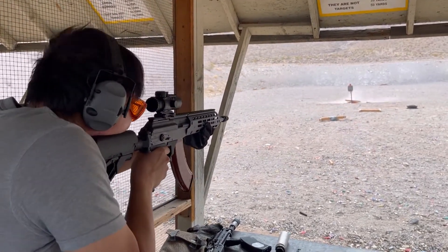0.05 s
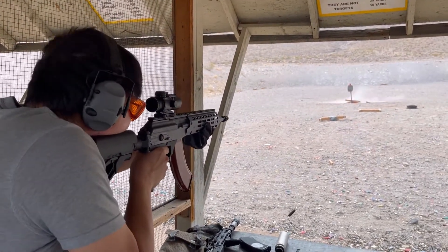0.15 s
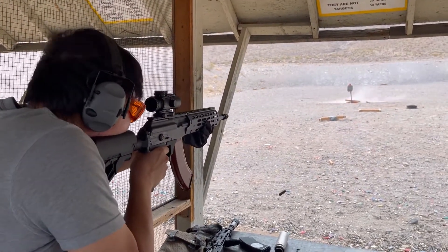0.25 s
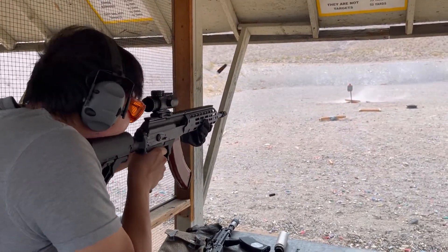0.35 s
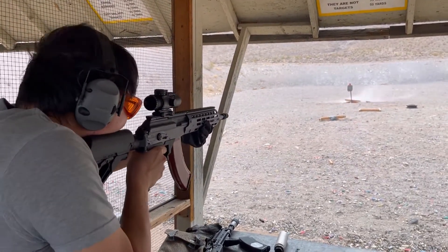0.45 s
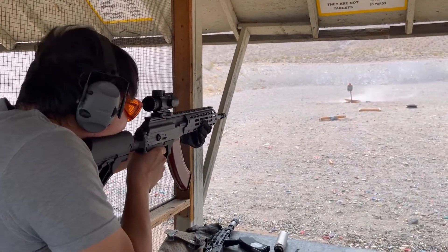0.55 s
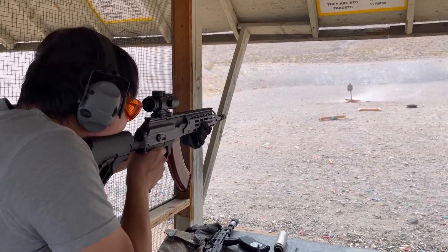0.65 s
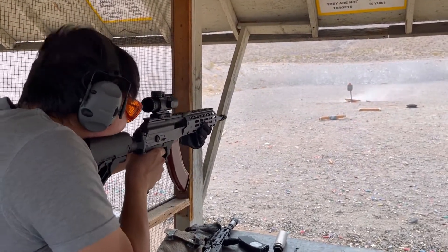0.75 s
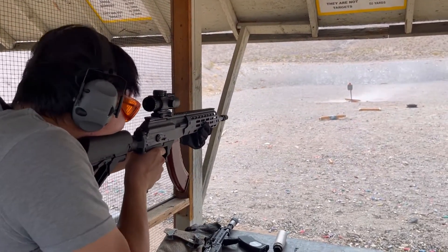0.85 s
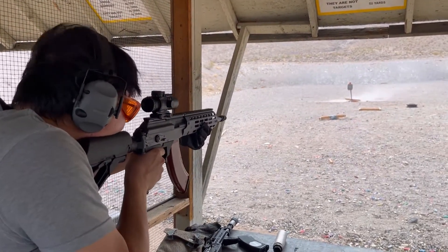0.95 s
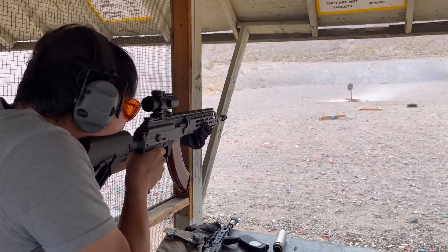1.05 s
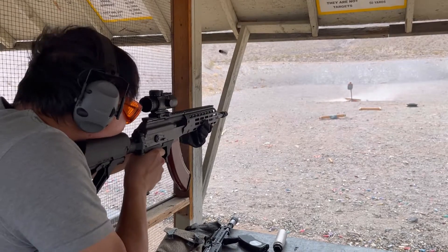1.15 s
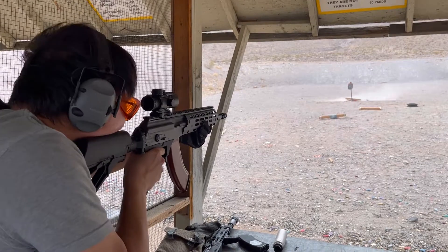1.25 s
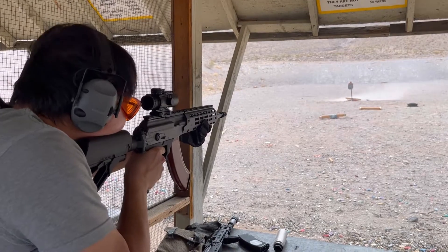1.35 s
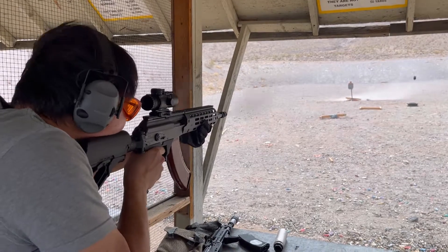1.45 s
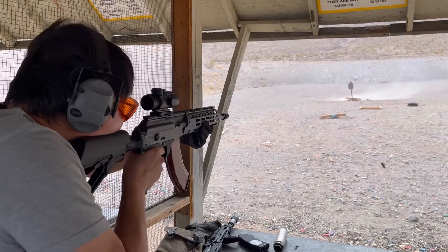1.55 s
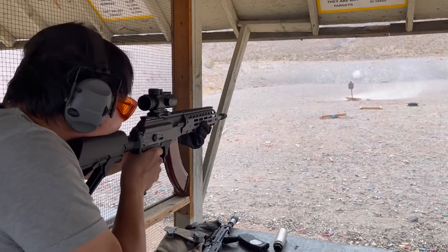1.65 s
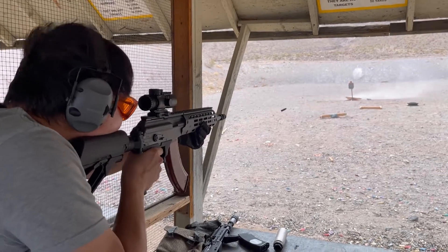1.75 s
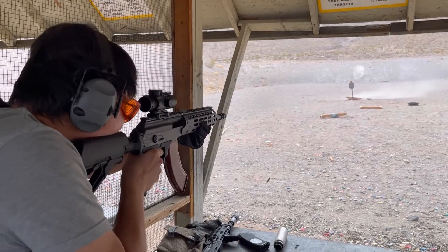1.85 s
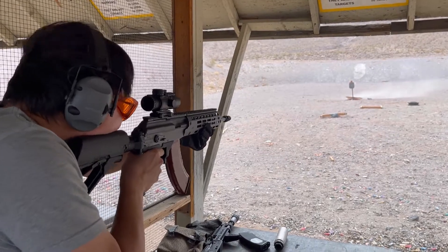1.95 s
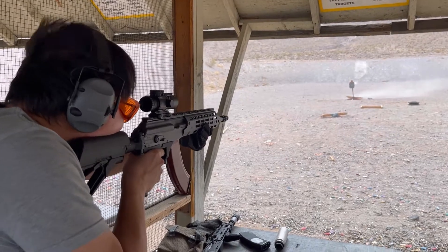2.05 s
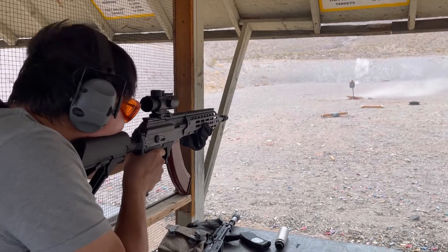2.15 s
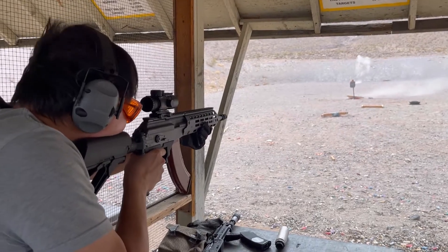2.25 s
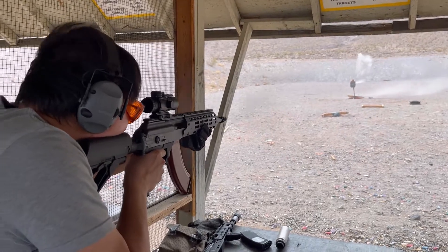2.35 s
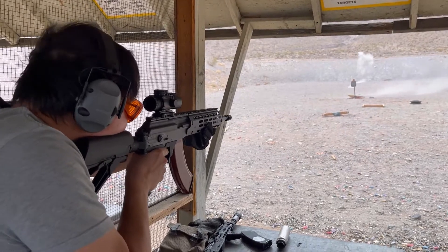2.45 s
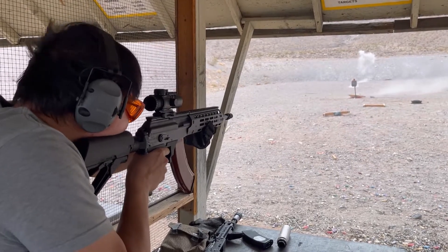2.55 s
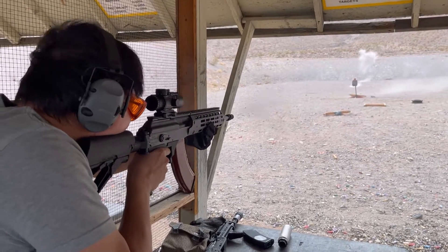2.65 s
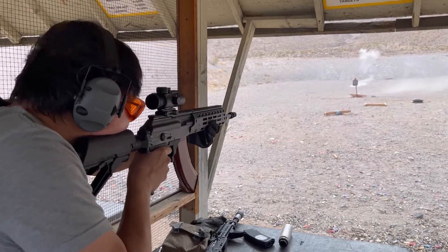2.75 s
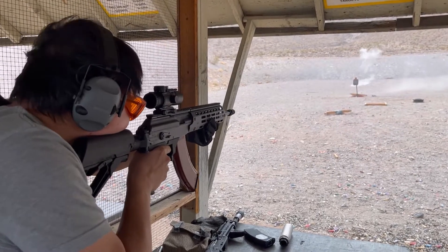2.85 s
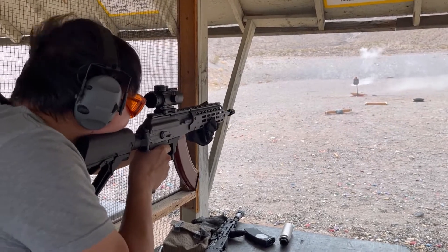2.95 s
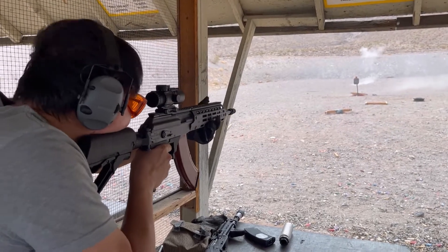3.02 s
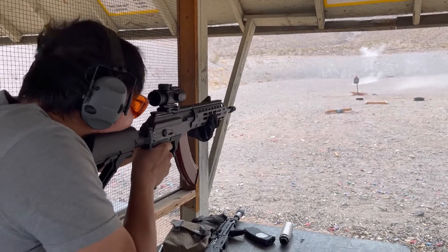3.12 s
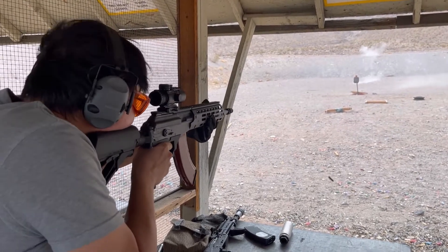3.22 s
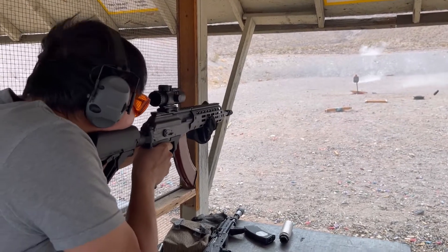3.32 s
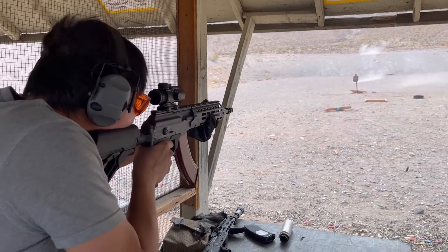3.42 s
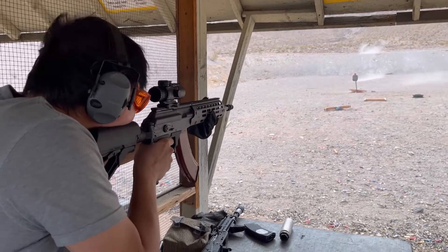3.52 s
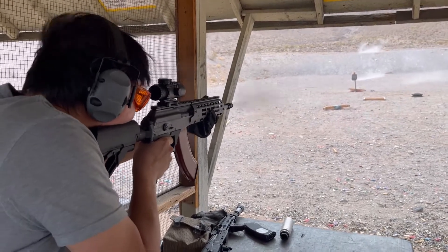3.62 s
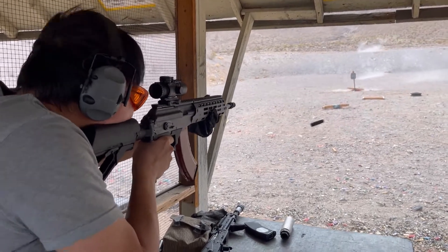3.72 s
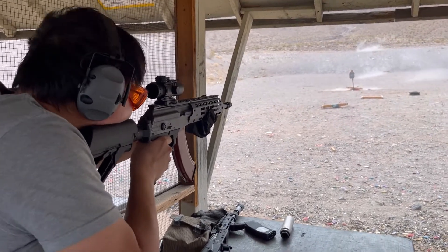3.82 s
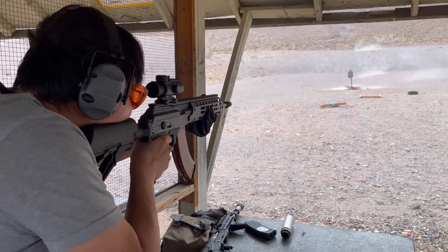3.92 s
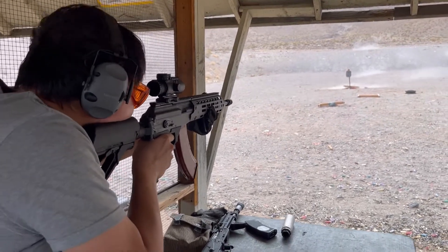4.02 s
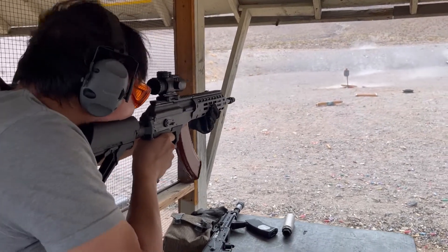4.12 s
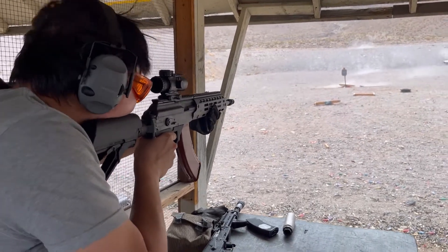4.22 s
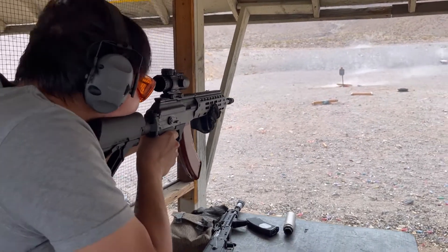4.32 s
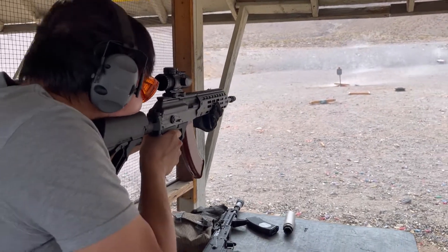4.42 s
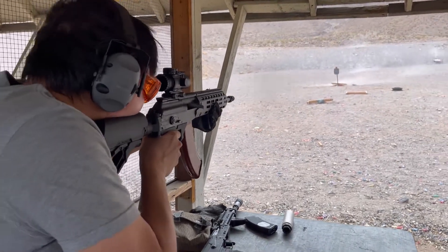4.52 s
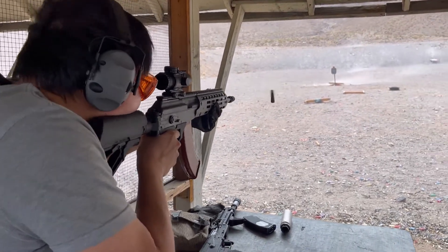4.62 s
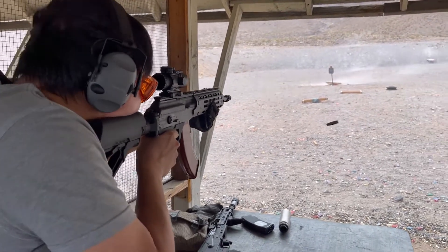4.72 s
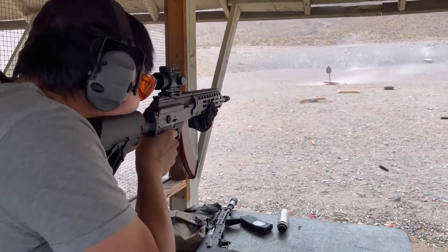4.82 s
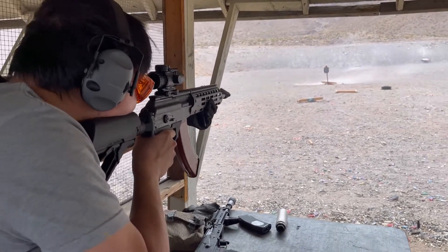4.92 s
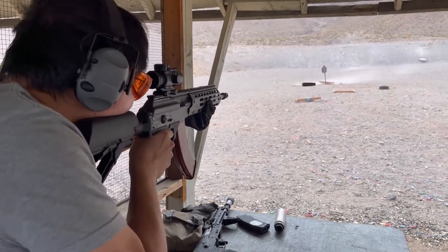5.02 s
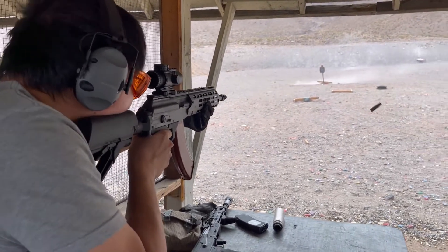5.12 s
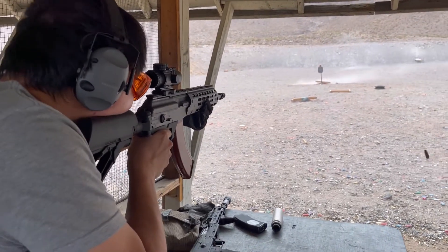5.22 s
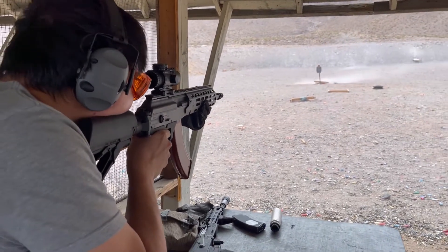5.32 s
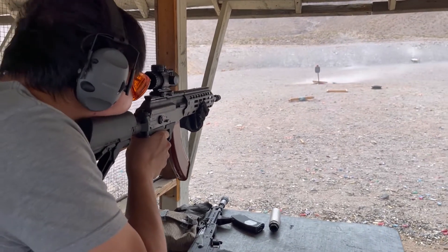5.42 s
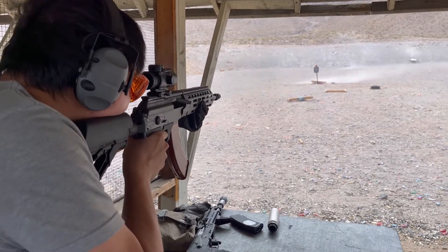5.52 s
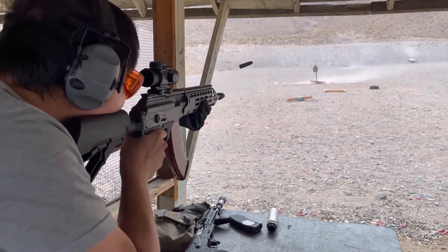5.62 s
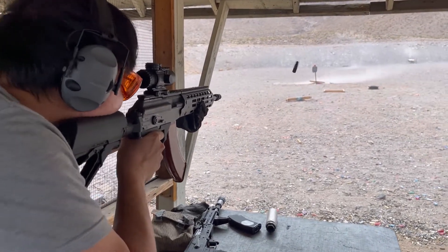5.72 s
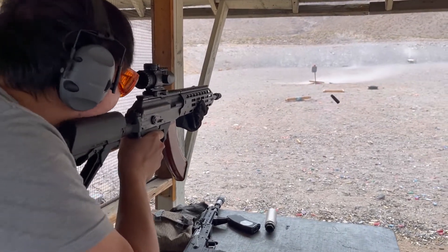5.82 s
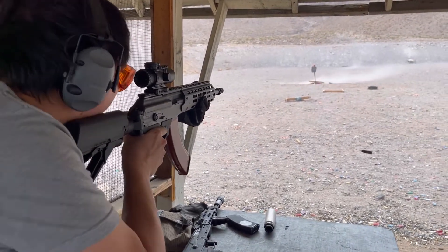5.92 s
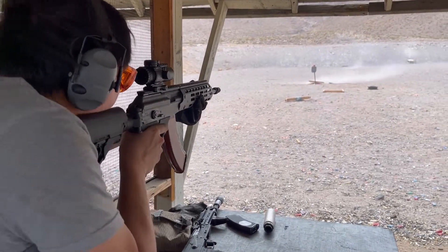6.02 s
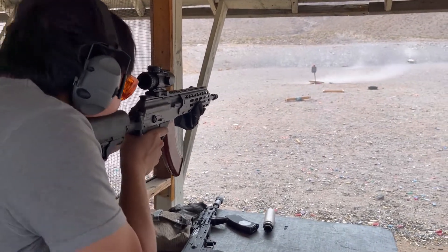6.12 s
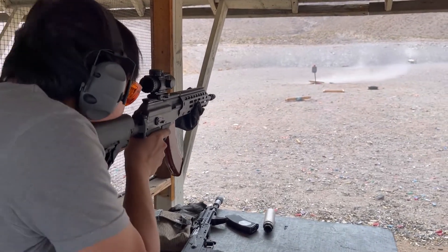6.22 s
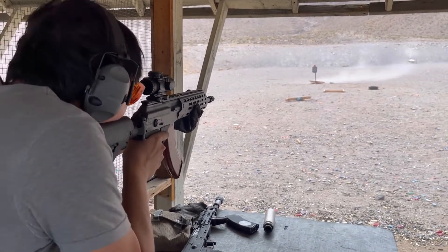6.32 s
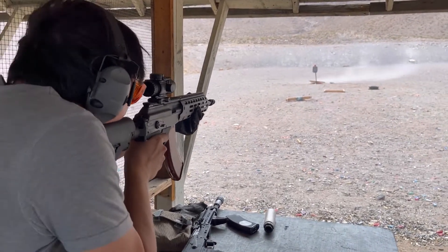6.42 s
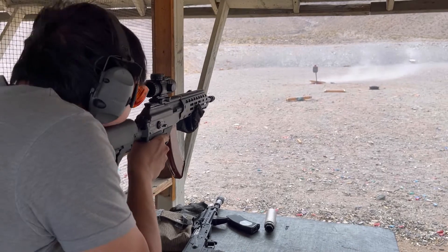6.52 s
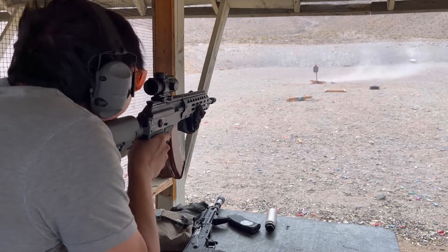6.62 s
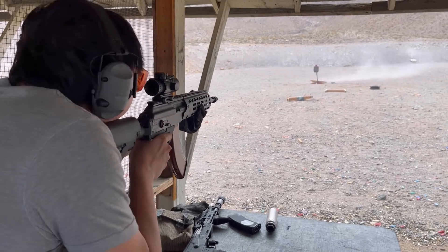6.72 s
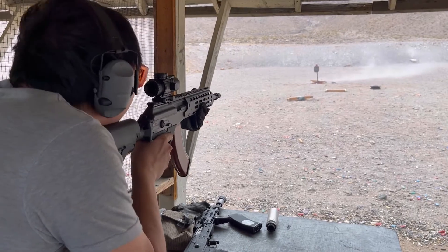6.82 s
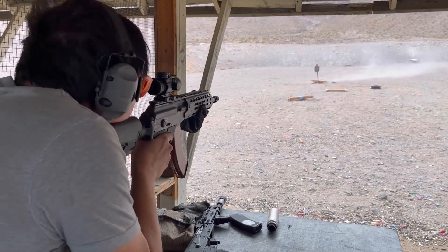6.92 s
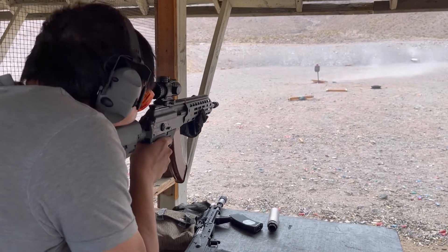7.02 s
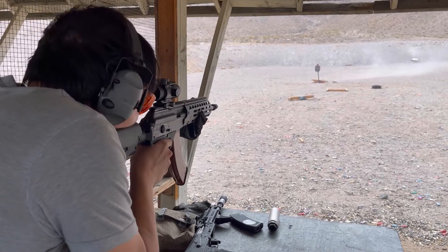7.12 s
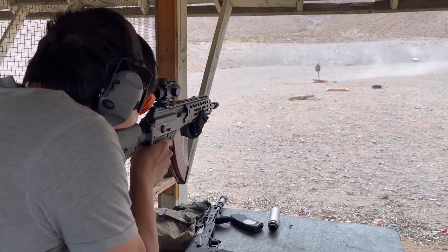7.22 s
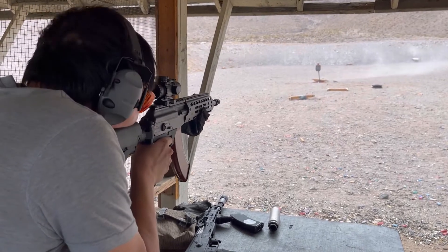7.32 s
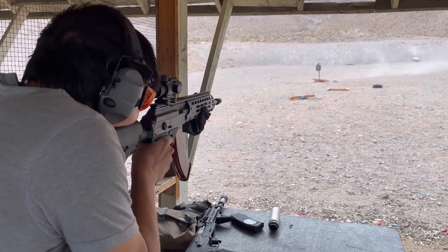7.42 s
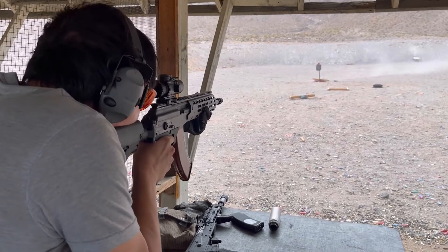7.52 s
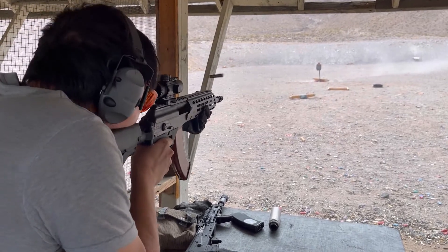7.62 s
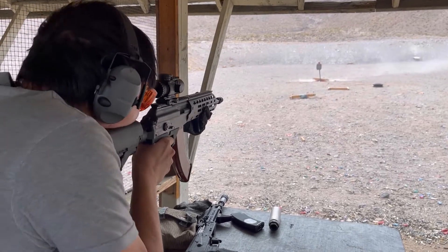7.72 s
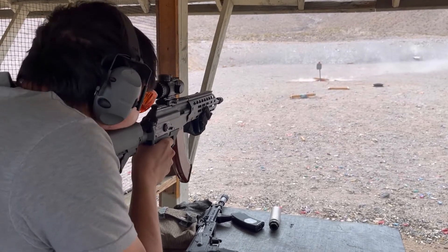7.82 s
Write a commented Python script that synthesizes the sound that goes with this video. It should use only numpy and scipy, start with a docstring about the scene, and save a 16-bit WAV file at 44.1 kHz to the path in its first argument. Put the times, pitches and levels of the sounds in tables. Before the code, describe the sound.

Sharp semi-automatic rifle cracks echo across an outdoor range, a distant steel target ringing after many, while wind buffets the microphone.

```python
"""A rifle fires fourteen quick shots under a wooden shelter roof, the first just before the start: filtered
noise that rolls around shelter and range in nearly the same way each time, with slaps and ringing boards.
Nine hits ring a steel plate downrange, as decaying modes behind a noise clank. Spent cases land in gravel
and gear ticks, as short noise bursts. Wind rumbles and rustles as filtered noise, and gusts buffet the
two-port pocket microphone a step away."""
import sys
import numpy as np
from scipy import signal
from scipy.fft import rfft, irfft, next_fast_len
from scipy.io import wavfile
from scipy.ndimage import uniform_filter1d

SR = 44100
rng = np.random.default_rng(int(sys.argv[2]) if len(sys.argv) > 2 else 0)


def to_wav(s):
    """Save 16-bit WAV."""
    ch = np.atleast_2d(s).T  # columns
    pcm = np.round(np.clip(ch, -1, 1) * 32767)  # PCM
    wavfile.write(sys.argv[1], SR, pcm.astype(np.int16))


def gain_from_db(level_db):
    """Convert decibel levels to linear amplitude factors (20 dB per decade)."""
    decades = np.asarray(level_db, float) / 20
    return 10 ** decades


N = 346626
TIME = np.arange(next_fast_len(N, True)) / SR  # s, padded to a quick transform length


def hz_of(count):
    """Frequencies of a real transform, nudged off zero so their logarithm exists."""
    return np.fft.rfftfreq(count, 1 / SR) + 0.00072


def colour(x, points):
    """Filter by (f/Hz, level/dB) points, joined along log frequency."""
    hz, db = np.transpose(points)
    gain = gain_from_db(np.interp(np.log(hz_of(x.shape[-1])), np.log(hz), db))
    return irfft(rfft(x) * gain, x.shape[-1])


def unit(x):
    """Scale to rms 1."""
    return x / np.sqrt(np.mean(x ** 2))


def noise(count):
    """Two unrelated arrivals of white noise."""
    return rng.standard_normal((2, count))


def add(out, s, sound):
    """Mix a sound in at a time; it may start early or end late."""
    i = int(round(s * SR))
    out[:, max(i, 0):i + sound.shape[1]] += sound[:, max(-i, 0):out.shape[1] - i]


def burst(hz, t60, rise, octaves):
    """A short noise around a pitch that rises and dies away; it is 30 dB down at octaves to either side."""
    t = np.arange(2 ** 13) / SR
    band = [(hz / 2 ** octaves, -30), (hz, 0), (hz * 2 ** octaves, -30), (hz * 4 ** octaves, -70)]
    return unit(colour(noise(len(t)), band)) * (1 - np.exp(-t / rise)) * gain_from_db(-60 * t / t60)


def walk(rate):
    """Random levels held 1 / rate s and slewed twice; their spread is a little under 1."""
    k = int(SR / rate)
    steps = np.repeat(rng.standard_normal(len(TIME) // k + 1), k)
    return uniform_filter1d(uniform_filter1d(steps, k // 2), k // 2)[:len(TIME)]


def modes(table, t, rise):
    """One decaying complex rotation per (f/Hz, level/dB, t60/s) mode."""
    hz, db, t60 = np.transpose(table)[:, :, None]
    return (1 - np.exp(-t / rise)) * gain_from_db(db - 60 * t / t60) * np.exp(2j * np.pi * hz * t)


def strike(rotations, gains):
    """Each mode starts at its own phase, nearly the same for both arrivals."""
    turns = rng.random(len(gains)) + .04 * rng.standard_normal((2, len(gains)))
    return ((gains * np.exp(2j * np.pi * turns)) @ rotations).imag


# slow swell of the wind, around which it wanders: [t/s, level/dB]
WIND_SWELL = [(0, -41.5), (1.0, -37.5), (1.6, -38), (2.3, -43), (2.98, -34.5), (3.09, -40.5), (3.45, -44.5),
              (4.0, -44), (4.8, -41), (5.3, -43), (5.9, -45), (6.2, -40.5), (6.5, -41), (6.65, -55.5),
              (7.25, -68), (7.37, -66), (7.5, -57.5)]
# relative spectrum of the large eddies' rumble: [f/Hz, level/dB]
RUMBLE_COLOUR = [(20, -29), (45, -5), (80, 0.5), (150, -3), (260, -6), (900, -72.5)]
# relative spectrum of the lighter rustle: [f/Hz, level/dB]
RUSTLE_COLOUR = [(150, -19), (300, 2), (600, -2), (1200, -15), (2400, -34.5), (5000, -60.5),
                 (12000, -100.5)]
# gusts breaking on the ports: [t/s, level/dB, length/s]
GUST_TIMES = [(3.03, -42, 0.026), (3.258, -42, .04), (3.341, -28.5, 0.017), (3.366, -40, .02),
              (3.452, -36.5, 0.015), (3.501, -49, 0.18), (5.37, -47, 0.077), (5.976, -40.5, 0.031),
              (6.032, -37.5, .065), (6.13, -40.5, .09), (6.329, -43, 0.097), (6.496, -30.5, 0.025),
              (6.519, -36, .015), (6.593, -37.5, .03), (6.77, -45.5, .05), (6.843, -40, 0.085),
              (6.999, -41.5, 0.051), (7.088, -45.5, 0.21), (7.268, -43, .04), (7.42, -51, .12)]
# relative spectrum of the brightest snaps of wind in the ports: [f/Hz, level/dB]
SNAP_COLOUR = [(200, -18.5), (600, -0.5), (1500, -6), (3000, -24), (6000, -42)]
GUST_ATTACK_S, GUST_RELEASE_S, GUST_SAG_DB = 0.0034, 0.009, -5.5
FLUTTER_DB = 4  # scales a random walk
SNAPS_PER_S, SNAP_SPREAD_DB = 420, 2
SNAP_DB = -25.5  # snaps' rms over the gusts' rms


def gust_level():
    """Gusts arrive fast, sag, flutter and trail off."""
    s, db, length = np.transpose(GUST_TIMES)[:, :, None]
    t = TIME - s
    attack = np.clip(t / GUST_ATTACK_S, 0, 1)
    release = np.clip(1 - (t - length) / GUST_RELEASE_S, 0, 1) ** 2
    sagging = gain_from_db(db + GUST_SAG_DB * np.clip(t / length, 0, 1))
    return np.sum(attack * release * sagging, axis=0) * gain_from_db(FLUTTER_DB * walk(70))


def wind_snaps(gusts):
    """Sparse random clicks of uneven size, loud where the gusts are."""
    clicks = rng.random(len(TIME)) < SNAPS_PER_S / SR
    sizes = gain_from_db(SNAP_SPREAD_DB * rng.exponential(size=len(TIME)))
    snaps = unit(colour(gusts * clicks * sizes * noise(len(TIME)), SNAP_COLOUR))
    return gain_from_db(SNAP_DB) * snaps * np.sqrt(np.mean(gusts ** 2))


def wind():
    """Large eddies make a wandering rumble; rustle flickers faster above it, and gusts lift both and snap."""
    swell = gain_from_db(np.interp(TIME, *np.transpose(WIND_SWELL)))
    gusts = gust_level()
    rumble = unit(colour(noise(len(TIME)), RUMBLE_COLOUR))
    rumble = (swell * gain_from_db(5.5 * walk(22)) + gain_from_db(-13.5) * gusts) * rumble
    rustle = unit(colour(noise(len(TIME)), RUSTLE_COLOUR))
    rustle_level = gain_from_db(-12.5 + 4.1 * walk(40)) * swell + gain_from_db(-10.0) * gusts
    return wind_snaps(gusts) + rumble + rustle_level * gain_from_db(4.0 * walk(160)) * rustle


# gear ticking: [t/s, level/dB]
GEAR_TICKS = [(3.1801, -48), (3.311, -54), (3.347, -47), (4.387, -45), (5.3884, -46), (6.0631, -34.5),
              (6.094, -44), (6.351, -47), (6.434, -55), (6.505, -46), (6.789, -51), (6.905, -48),
              (7.012, -52.5), (7.097, -50), (7.276, -53)]


def gear():
    """Small parts knock together in dry, very short ticks."""
    out = np.zeros((2, len(TIME)))
    for s, db in GEAR_TICKS:
        add(out, s, gain_from_db(db) * burst(1880, 0.011, 0.00047, 1.45))
    return out


# spent cases landing in gravel: [t/s, level/dB, centre f/Hz, t60/s]
CASE_LANDINGS = [(0.198, -49.5, 9000, 0.03), (0.605, -43.5, 3900, 0.18), (1.026, -48, 4000, 0.072),
                 (1.794, -47, 8920, 0.097), (2.112, -49.5, 8000, 0.063), (2.958, -57, 7930, 0.11),
                 (3.973, -51, 8940, 0.16), (4.322, -52.5, 9120, .04), (5.198, -41, 8500, 0.17),
                 (6.237, -57.5, 8980, 0.089), (6.618, -64, 9970, 0.069)]


def cases():
    """Cases scatter gravel in short, mostly bright hisses."""
    out = np.zeros((2, len(TIME)))
    for s, db, hz, t60 in CASE_LANDINGS:
        add(out, s, gain_from_db(db) * burst(hz, t60, 0.0017, 4.1))
    return out


# steel plate, six families of mode shapes, before its swing fades them: [f/Hz, level/dB, t60/s]
PLATE_FAMILIES = [
    [(2067, 0, 1), (7990, -12, 0.4)],
    [(6008, 0, 0.7), (10030, -8, .5)],
    [(2790, -7, 0.3), (4745, -4, 0.25), (5808, 0, 0.55)],
    [(5620, -9, 0.45), (6475, 0, 0.22), (7800, -9, 0.45), (8710, -6, .3), (11370, -5, 0.3)],
    [(6912, 0, 0.22), (8850, -11, .17)],
    [(4274, 0, 0.55), (5100, -7, .4)],
]
# bullets on the plate, a tenth of a second after their shot; where each lands decides what rings:
# [t/s, then level/dB of each of the six families]
PLATE_HITS = [(-.003, -48, -46.5, -64, -62.5, -58, -46.5), (.833, -67.5, -49, -52, -63, -33.5, -45.5),
              (1.205, -37, -62, -46, -64.5, -67.5, -66.5), (3.723, -60.5, -65, -62.5, -66.5, -65, -59.5),
              (4.16, -66, -74, -70, -46.5, -65, -65), (4.602, -67.5, -53.5, -35, -34.5, -59.5, -64),
              (4.965, -35, -33.5, -40.5, -34, -51.5, -43.5), (5.599, -53, -41, -41, -60, -69, -48),
              (7.689, -43, -57, -64, -68, -83, -68)]
SWUNG_DB = -27  # part of the ring that the fade leaves
SWING_HZ, SWING_DB = 6, 1.5


def plate():
    """A clank, then the plate's modes by family; they waver as it turns and fade as it swings away."""
    t, out = np.arange(SR) / SR, np.zeros((2, len(TIME)))
    swing_away = np.exp(-(t / 0.19) ** 3) + gain_from_db(SWUNG_DB)
    rotations = modes(sum(PLATE_FAMILIES, []), t, rise=0.008) * swing_away
    sizes = [len(family) for family in PLATE_FAMILIES]
    for s, *family_db in PLATE_HITS:
        # each mode swells and dips from its own point in the cycle
        cycles = SWING_HZ * t + rng.random((len(rotations), 1))
        sway = gain_from_db(SWING_DB * np.cos(2 * np.pi * cycles))
        add(out, s, strike(rotations * sway, gain_from_db(np.repeat(family_db, sizes))))
        add(out, s, gain_from_db(-17.5) * burst(2500, 0.025, 0.0012, 8.6))
    return out


# single strong reflections, relative to the shot: [t/s after the shot, level/dB, f/Hz]
BLAST_SLAPS = [(0.034, -18, 711), (.056, -4.5, 400), (0.057, -9, 100), (.098, -16, 927),
               (0.147, -31, 388.6), (.19, -37, 500)]


def slaps(count):
    """Hard surfaces throw back short noises, the same ones for every shot."""
    out = np.zeros((2, count))
    for s, db, hz in BLAST_SLAPS:
        add(out, s, gain_from_db(db) * burst(hz, 0.025, 0.00081, 5.4))
    return out


# roof boards and posts, relative to the shot: [f/Hz, level/dB, t60/s]
SHELTER_MODES = [(147.7, -6.5, 0.98), (160.4, -13, 0.8), (169, -16, 0.6), (225, -16, 1), (234.5, -18, 0.95),
                 (365.7, -19.5, 0.99), (459, -24, 0.99), (536, -16.5, 0.83), (760, -20, 0.7),
                 (1085, -21.5, 0.57)]
SHELTER_SCATTER_DB = 1.5


def shelter_ring(boards):
    """Boards ring unequally from shot to shot; all start in step, the second arrival at its own phases."""
    gains = gain_from_db(SHELTER_SCATTER_DB * rng.standard_normal(len(boards)))
    turns = rng.random((2, len(boards))) * [[0], [1]]
    return ((gains * np.exp(2j * np.pi * turns)) @ boards).imag


# how shelter and range return a blast:
# [f/Hz, level/dB, near t60/s, far tail level/dB over the near part]
BLAST_RETURN = [(49, -31.5, .4, -26.5), (112, -15.5, 0.072, -28.5), (193, -15, 0.44, -20.5),
                (496, -9.5, 0.25, -17), (920, -8.5, 0.36, -27.5), (1956, -10, 0.25, -25.5),
                (3960, -13.5, 0.23, -28), (7070, -12.5, 0.27, -35), (11500, -12.5, .26, -48),
                (15270, -6, 0.035, -70.5)]
# build-up and hold in the bass; both are halved at their corner and keep shrinking above it
BUILD_S, BUILD_CORNER_HZ, HOLD_S, HOLD_CORNER_HZ = 0.017, 2410, 0.065, 3850
# the far tail fades slowly, then ends where the range stops answering
FAR_T60_S, FAR_ENDS_S = 1.29, 0.46


def return_bands(f, t):
    """Overlapping bands and their envelopes: lows come late and stay, then a far tail follows."""
    hz, db, t60, far_db = np.transpose(BLAST_RETURN)[:, :, None, None]
    build = BUILD_S / (1 + hz / BUILD_CORNER_HZ)
    hold = HOLD_S / (1 + hz / HOLD_CORNER_HZ)
    log_hz = np.log(hz.ravel())
    bands = np.sqrt([[np.interp(np.log(f), log_hz, one, right=0)] for one in np.eye(len(BLAST_RETURN))])
    bands = bands / np.sqrt(np.mean(bands ** 2, axis=-1, keepdims=True))
    near = gain_from_db(-60 * np.maximum(t - hold, 0) / t60)
    far = gain_from_db(far_db - 60 * t / FAR_T60_S) / (1 + (t / FAR_ENDS_S) ** 16)
    return bands, gain_from_db(db) * (1 - np.exp(-t / build)) * (near + far)


# rifle shots: [t/s, level/dB]
RIFLE_SHOTS = [(-.105, -14.5), (0.305, -11), (0.729, -10), (1.102, -10.5), (1.446, -10.5), (1.831, -11),
               (2.344, -11), (2.647, -10.5), (3.618, -11), (4.056, -11), (4.500, -11), (4.862, -11),
               (5.496, -11), (7.585, -12)]
LUMPS_DB = 1  # echoes come in lumps; scales a random walk


def rifle():
    """The place answers every blast alike in the bass; turbulence makes the treble new each time."""
    t, out = np.arange(24576) / SR, np.zeros((2, len(TIME)))
    f = hz_of(len(t))
    same = 1 / np.sqrt(1 + (f / 1800) ** 2)  # share common to all shots
    place = same * rfft(noise(len(t)))
    boards = modes(SHELTER_MODES, t, rise=0.031)
    alike = slaps(len(t))
    bands, shape = return_bands(f, t)
    for s, shot_db in RIFLE_SHOTS:
        arrivals = place + np.sqrt(1 - same ** 2) * rfft(noise(len(t)))
        echoes = np.sum(shape * irfft(bands * arrivals, len(t)), axis=0)
        echoes = echoes * gain_from_db(LUMPS_DB * walk(45.6)[:len(t)])
        add(out, s, gain_from_db(shot_db) * (alike + shelter_ring(boards) + echoes))
    return out


# the two ports: [f/Hz, likeness 0-1, right's phase lead/rad, right minus left level/dB]
PORT_PAIR = [(50, 0.9, 0, -1.5), (146, 0.8, -1.5, -0.5), (308, 0.87, 0.5, 0), (1600, 0, -0.82, -1),
             (3370, 1, 2.05, -3), (5300, 0.3, -0.63, -4.5), (8300, 0.7, 0.63, -2), (8930, 1, 1, 0),
             (12040, 0.9, 6, -0.5), (14960, 0.91, 13, -2.5)]


def ports(pair):
    """Two unrelated arrivals become left and right: part shared, turned in phase by the port spacing."""
    f = hz_of(pair.shape[1])
    hz, *columns = np.transpose(PORT_PAIR)
    like, lead, db = (np.interp(f, hz, column) for column in columns)
    like = np.clip(like, 0, 1)
    a, b = rfft(pair)
    right = gain_from_db(db) * (like * np.exp(1j * lead) * a + np.sqrt(1 - like ** 2) * b)
    return irfft(np.array([a, right]), pair.shape[1])


def scene():
    """Everything reaches the two ports."""
    return ports(wind() + gear() + cases() + plate() + rifle())[:, :N]


def top_cut(x):
    """Nothing passes above the cut-off."""
    return signal.sosfilt(signal.butter(12, 16950, fs=SR, output="sos"), x)


# the microphone's uneven top end and its cut: [f/Hz, level/dB]
MIC_TOP = [(9000, 0), (10800, 3), (11600, 5), (12400, -8.5), (13200, -30.5), (15900, -22.5), (16500, -70.5)]


def record(dry):
    """The loudest peaks are rounded; the top is uneven and cut."""
    rounded = np.tanh(0.98 * dry) / 0.88
    return top_cut(colour(rounded, MIC_TOP))


dry = scene()
out = record(dry)
to_wav(out)
```